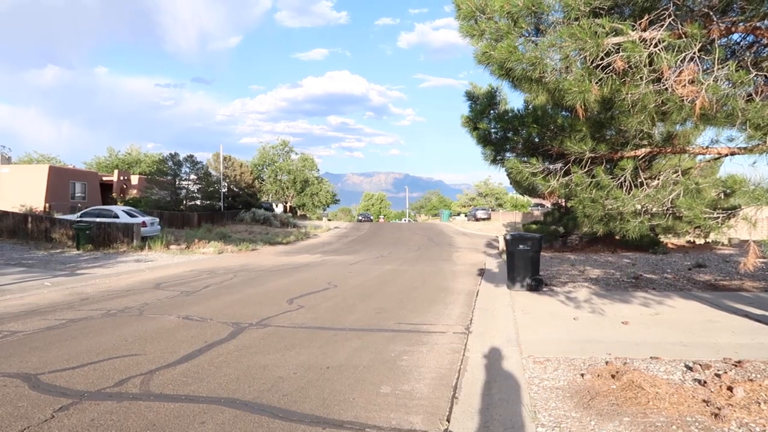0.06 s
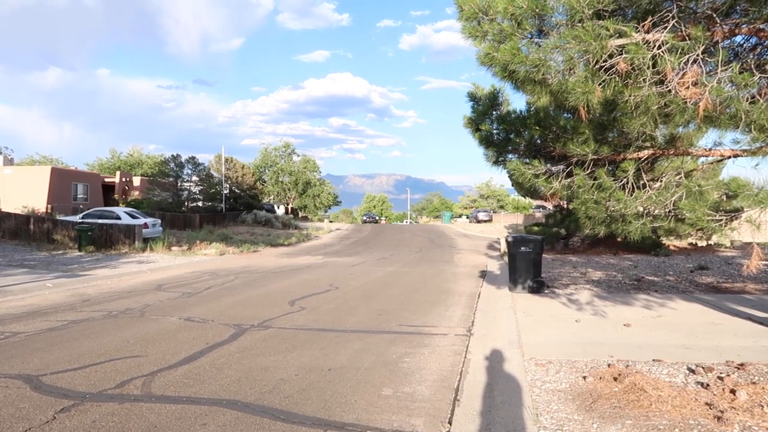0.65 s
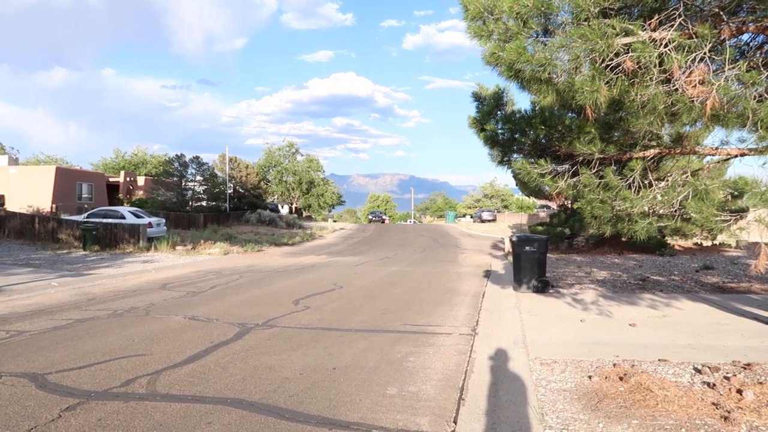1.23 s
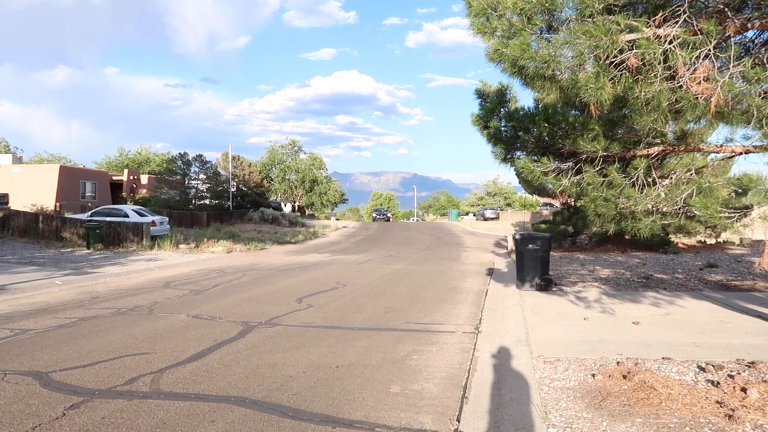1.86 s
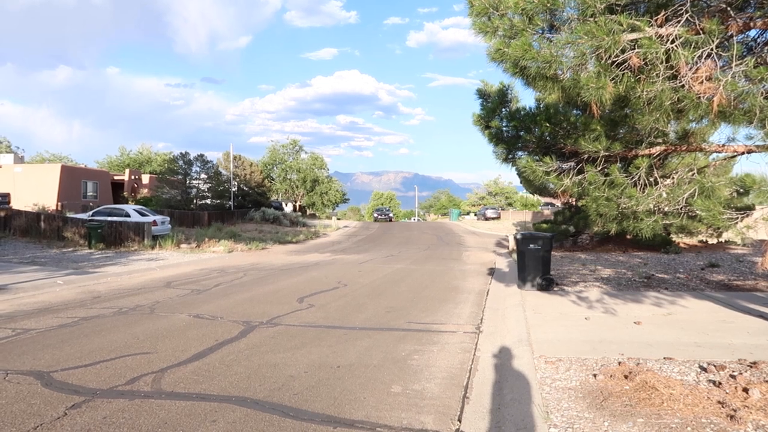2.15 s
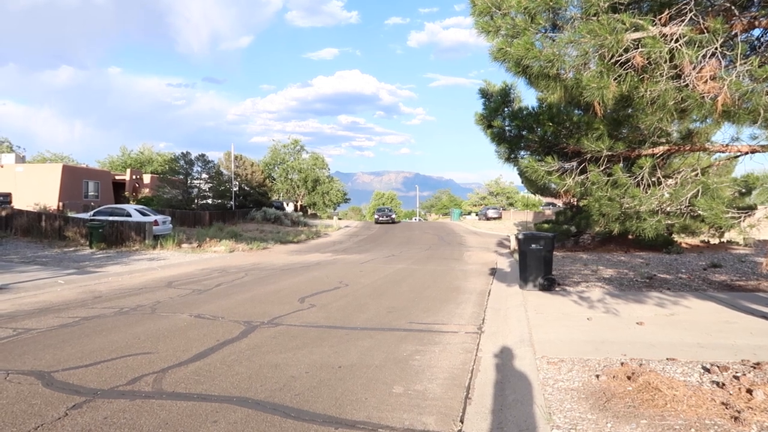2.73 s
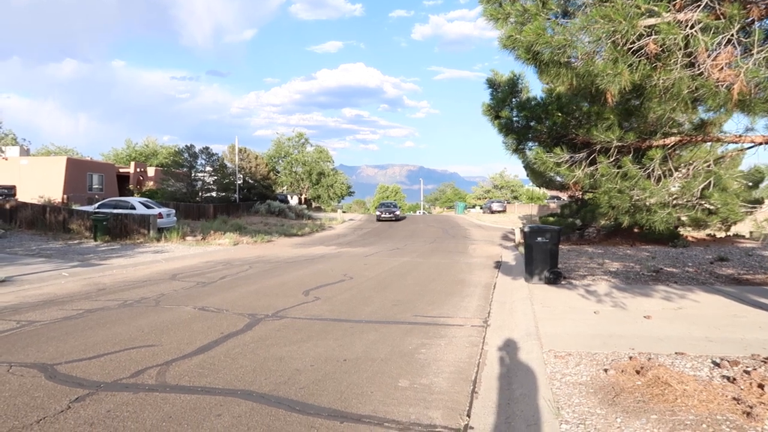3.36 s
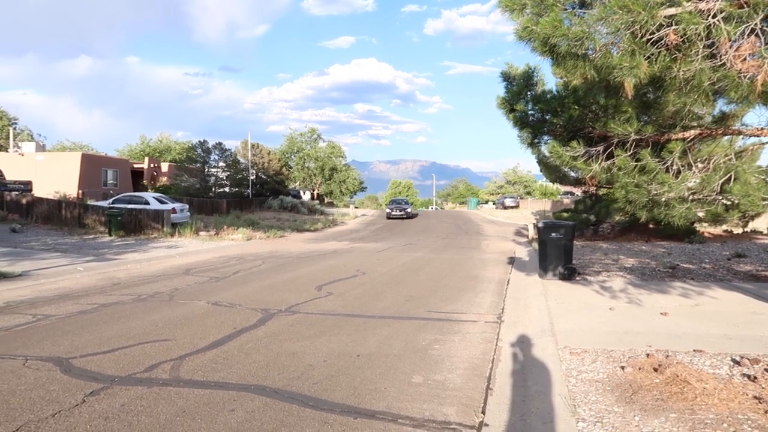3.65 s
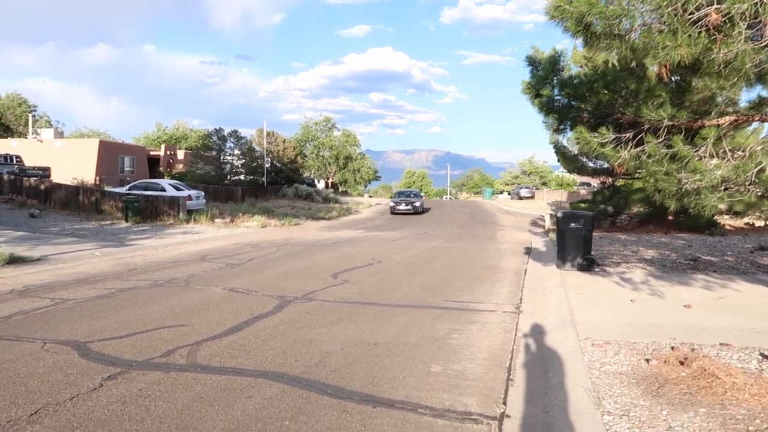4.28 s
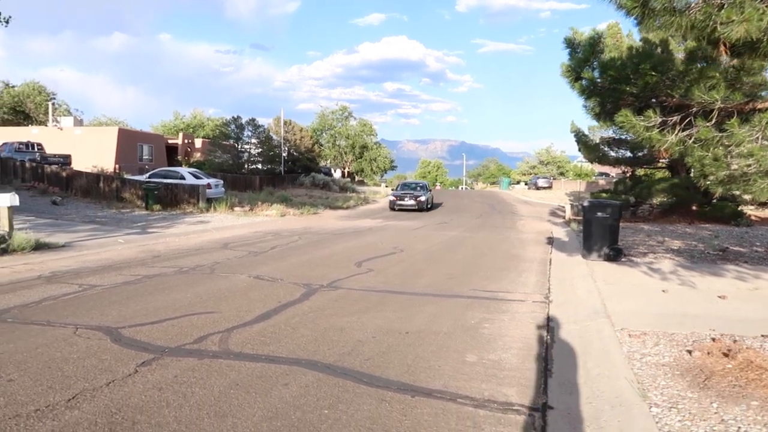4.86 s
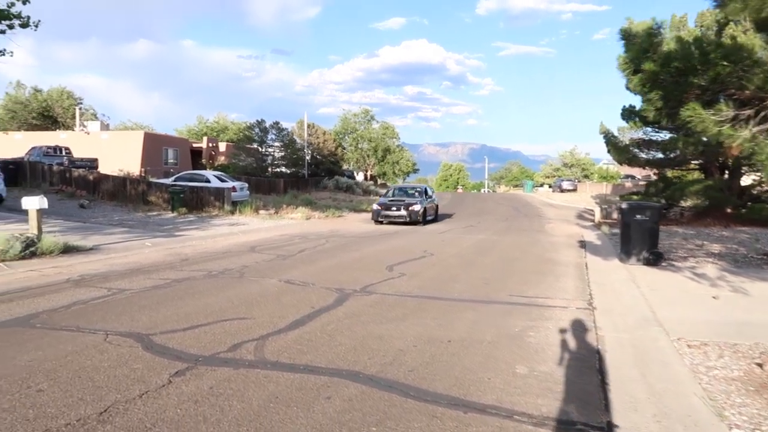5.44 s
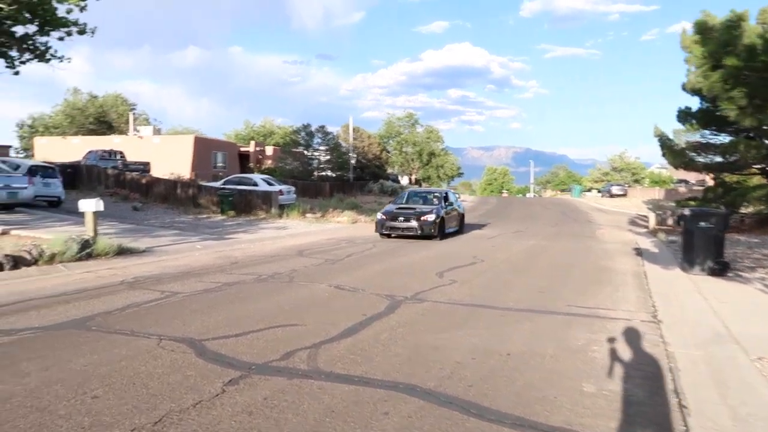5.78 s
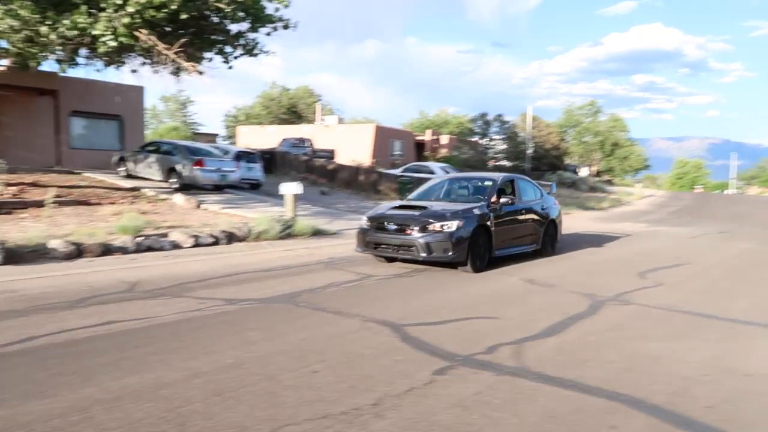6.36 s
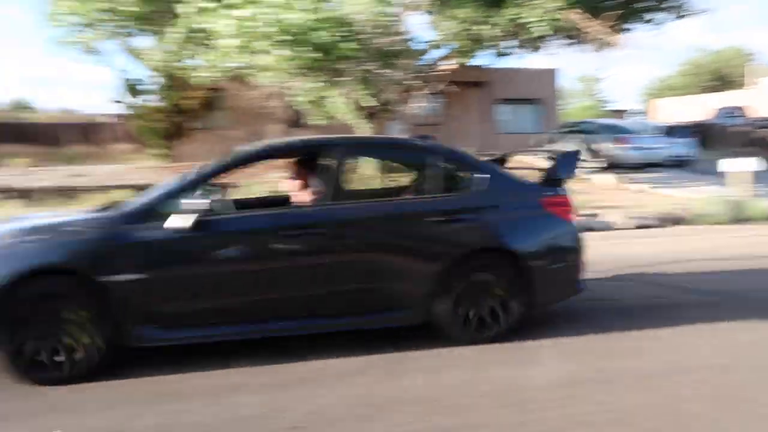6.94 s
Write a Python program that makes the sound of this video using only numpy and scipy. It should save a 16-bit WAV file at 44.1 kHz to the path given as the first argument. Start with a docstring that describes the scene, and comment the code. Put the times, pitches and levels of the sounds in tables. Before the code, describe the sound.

A car's low, uneven exhaust throb is heard in the distance over the soft hush of a quiet street. Faint bird whistles come at about 1, 3 and 4.5 seconds, and a very faint insect trills repeatedly until around 5 seconds. From about 2.7 seconds, gusts of wind buffet the microphone with a low rumble. The car accelerates closer without changing gear, its burbling note rising in pitch and growing louder from 3.5 seconds as the tyre roar builds. A few thin ticks sound near the microphone, the clearest at about 4.6 seconds. Near 5.8 seconds the turbo draws air in short, soft whooshes. From 6.3 seconds the car passes close by: the tyres hiss and snap over grit, the exhaust gives a raspy growl and the wind buffets harder. The car is still loud and close at the end, around 7 seconds.

```python
"""A turbocharged flat-four car pulls up a quiet street in one gear and passes close by.
At first its uneven exhaust pulses throb from behind a crest, while birds and an insect call in gardens.
From 2.7 s gusts buffet the microphone; the revs climb, and the exhaust and tyre roar grow.
Near 5.8 s the turbo draws air. From 6.3 s the car draws level: tyres flick grit, the tailpipe growls."""
import sys
import numpy as np
from scipy import signal
from scipy.fft import rfft, irfft
from scipy.io import wavfile
from scipy.ndimage import uniform_filter1d

SR = 44100
rng = np.random.default_rng(int(sys.argv[2]) if len(sys.argv) > 2 else 0)


def generate_wav(signal):
    """Clip the signal to [-1, 1] and save it as 16-bit WAV at the path in sys.argv[1]."""
    frames = np.transpose(np.atleast_2d(signal))
    scaled = np.clip(frames, -1, 1) * 32767
    pcm = np.round(scaled).astype(np.int16)
    wavfile.write(sys.argv[1], SR, pcm)


N = 313462
TIME, FREQS = np.arange(N) / SR, np.fft.rfftfreq(N, 1 / SR)

# left-right likeness of car noise and wind rumble: freq_hz, correlation
LIKENESS = [(150, 1), (500, 0.99), (1200, 0.98), (4000, 0.67), (9000, 1), (14000, .3)]


def exhaust(start_cycles=.254, jitter_cycles=.002, overtone_db=-13.5, rasp_db=-4):
    """Engine orders and gas noise that puffs on each of four firings a cycle, growing as the car nears."""
    # engine speed as heard: time_s, cycle_hz
    engine = [(0, 19.894), (.7, 20.432), (1.3, 20.538), (2.2, 20.515), (2.8, 20.942), (3.3, 21.572),
              (3.9, 22.598), (4.5, 23.928), (5, 25.577), (5.5, 27.516), (6, 29.962), (6.5, 32.962),
              (7.11, 37.26)]
    # gas noise: freq_hz, density_db
    rasp_spectrum = [(120, -25.5), (200, 3.5), (270, 5), (350, -6.5), (470, -1.5), (580, -6.5),
                     (700, -13.5), (1000, -18), (1500, -24.5), (4000, -55)]
    cycle_hz = curves(engine)[0]
    angle = 2 * np.pi * (start_cycles + np.cumsum(cycle_hz) / SR + jitter_cycles * wander(33))
    near = rise(5.62, .068)
    tones = overtones(angle, near)
    chug = 1 + blend(.15, .5, near) * np.cos(angle) + .3 * np.cos(4 * angle)
    rasp = noise(rasp_spectrum, LIKENESS) * unit(chug)
    bark = amp(overtone_db) * tones + amp(rasp_db) * rasp + resonances(angle, cycle_hz)
    bark_db = crest_db(-29, hidden_db=12.5, at_s=3.21, over_s=1.33) + 2 * rise(6.06, .15)
    return boom(angle, near) + amp(bark_db) * bark + growl(angle)


def boom(angle, near, fading_db=1.2):
    """The firing note and the strong orders that beat against it, locked to the crank: a regular throb."""
    # strong orders: time_s, firing_db, lower_burble_db, upper_burble_db
    levels = [(0, -28, -32, -25.5), (.45, -35, -25, -24), (.95, -28.5, -30, -29.5), (1.65, -28, -32.5, -34),
              (2.5, -23, -25.5, -24), (3.2, -23.5, -21.5, -22), (3.58, -16, -15.5, -21),
              (4.05, -12.5, -20, -19.5), (4.6, -17.5, -17.5, -19.5), (5.05, -13.5, -19.5, -19.5),
              (5.5, -13.5, -18, -29), (5.85, -12.5, -19.5, -33), (6.15, -19.5, -17.5, -28.5),
              (6.6, -21.5, -21, -26.5), (6.9, -16, -25.5, -34)]
    # burble weights: order, far_db, near_db
    burble = [(3, -21.5, -6.5), (5, 0.5, -0.5), (7, 0, -13), (8, -5.5, 1.5), (9, -17, -5.5)]
    firing_db, lower_db, upper_db = curves(levels)
    out = amp(firing_db - dip_db(4)) * np.cos(4 * angle)
    # the path spreads the orders in time until the direct sound takes over
    spread_rad = 2 * np.pi * blend(.042, -.01, rise(4.7, .8))
    for k, far_db, near_db in burble:
        echo_rad = blend(.2, .12, near) * wander(3)
        lag_rad = spread_rad * (k - 4.3) ** 2 + np.pi / 2 * (k < 4) + echo_rad
        level_db = (lower_db if k < 6 else upper_db) + fading_db * wander(4)
        out += amp(level_db + blend(far_db, near_db, near) - dip_db(k)) * np.cos(k * angle - lag_rad)
    uneven_db = blend(.5, .8, near) * wander(17)
    return np.sqrt(2) * out * amp(uneven_db)


def dip_db(k):
    """Brief drops in the level of order k."""
    # dips: centre_s, order, half_length_s, depth_db
    dips = [(1.098, 4, .07, 9), (1.793, 5, 0.12, 10), (3.263, 5, 0.066, 12), (3.766, 4, 0.11, 8),
            (4.297, 5, 0.062, 8), (4.357, 4, 0.15, 10), (4.716, 5, 0.063, 8), (5.103, 8, 0.26, 18.5),
            (5.25, 4, 0.042, 16.5), (5.66, 5, 0.046, 3.5), (5.727, 4, 0.039, 20), (6.976, 4, 0.033, 17),
            (7.048, 5, 0.15, 7)]
    return sum(depth_db * bump(s, half_s) for s, order, half_s, depth_db in dips if order == k)


def overtones(angle, near, smear_cycles=.01716, scatter=.35):
    """Weaker orders arrive both directly and scattered off the street, so they flutter."""
    # weighting by the unequal headers: order, far_db, near_db
    orders = [(6, 0, 0), (10, -1, -3), (11, 4, -4), (12, 4.5, -1), (13, 0, 0), (14, -7, -7), (15, -2, -5),
              (16, 0, -5), (17, -6, -11), (18, -9, -4), (19, -3, -5), (20, -5, -6), (21, -3, -5),
              (22, -7, -7), (23, -2, -13), (24, -3, -14), (25, -8, -15), (26, -8, -10), (28, -7, -12),
              (29, -11, -13), (33, -7, -16)]
    out = 0
    for k, far_db, near_db in orders:
        phase = k * angle - np.pi * smear_cycles * (k - 3) ** 2  # treble leaves the pipe last
        flutter = 1 + scatter * wander(4)
        echo_rad = blend(1.3, .5, near) * wander(2)
        out += blend(amp(far_db), amp(near_db), near) * flutter * np.cos(phase + echo_rad)
    return np.sqrt(2) * out


def resonances(angle, cycle_hz):
    """Single orders sing out as the revs sweep them through resonances of the car."""
    # resonances: order, centre_hz, half_width_ratio, level_db
    modes = [(33, 686, .02, -13), (28, 630, .016, -13), (33, 744, .014, -15), (12, 292, .07, -13),
             (21, 567, .035, -7), (33, 895, .03, -17), (22, 672, .03, -9), (13, 390, .035, -8),
             (17, 562, .04, 2), (23, 488, .03, -6), (16, 326, .02, -11), (26, 850, .04, -19),
             (28, 938, .025, -17), (21, 700, .016, -12), (34, 1195, .025, -13), (17, 622, .025, -7),
             (13, 474, .025, -5.5)]
    out = 0
    for k, hz, width, db in modes:
        in_tune = np.exp(-((k * cycle_hz / hz - 1) / width) ** 2)
        out += amp(db + wander(28)) * in_tune * np.cos(k * angle)
    return np.sqrt(2) * out


def growl(angle, ragged=.55):
    """Each firing throws a ragged puff that rings the tailpipe, strongest once a cycle."""
    # pipe response: freq_hz, gain_db
    tailpipe = [(250, -56), (430, 1), (540, 1), (640, 10.5), (760, -4), (900, -17), (1500, -31),
                (4000, -47)]
    # growls: centre_s, half_length_s, level_db
    growls = [(6.62, .07, -31), (7.055, .07, -24)]
    puffs = ((1 + np.cos(4 * angle)) / 2) ** 8 * (1 + .5 * np.cos(angle))
    gas = unit(uniform_filter1d(rng.standard_normal(N), size=20))
    ring = irfft(rfft(puffs * (1 + ragged * gas)) * amp(at_hz(tailpipe, FREQS)), N)
    return unit(ring) * swells(growls)


def rolling():
    """Tread roar on coarse asphalt, air rushing round the car and, up close, a fine spray of grit."""
    # roar, rush and spray: freq_hz, density_db
    roar_spectrum = [(300, -30), (600, 1.5), (800, -2), (960, 0), (1150, -5.5), (1290, -9.5), (1500, -12),
                     (2000, -19.5), (3500, -32.5), (8000, -61)]
    rush_spectrum = [(800, -17.5), (1500, 1), (2200, 2), (3100, -0.5), (4000, -6), (5000, -12),
                     (6000, -16.5), (8000, -23), (12000, -53.5)]
    spray_spectrum = [(2500, -15.5), (5000, -1), (7000, -2.5), (9000, -8), (13000, -7.5), (15000, -26.5)]
    # coarse asphalt: centre_s, half_length_s, boost_db
    patches = [(4.648, 0.13, 2), (5.423, 0.035, 4.5), (5.726, 0.11, 2.5), (6.569, 0.078, 6),
               (6.89, 0.043, 1.5)]
    coarse_db = sum(db * bump(s, half_s) for s, half_s, db in patches)
    roar_db = crest_db(-35.5, hidden_db=15.5, at_s=2, over_s=1.5) + coarse_db
    rush_db = crest_db(-46, hidden_db=11, at_s=2.5, over_s=3) + .58 * coarse_db
    spray_db = crest_db(-55, hidden_db=43, at_s=5.5, over_s=.95) + .6 * coarse_db
    roar = noise(roar_spectrum, LIKENESS) * amp(roar_db + .9 * wander(49))
    rush = noise(rush_spectrum, LIKENESS) * amp(rush_db + wander(41))
    spray = noise(spray_spectrum, LIKENESS) * amp(spray_db + wander(80))
    return roar + rush + spray


def grooves():
    """Air pumped through the tread rings in narrow bands that change with the stretch of road."""
    # groove tones: centre_s, half_length_s, pitch_hz, half_width_hz, level_db
    bands = [(1.504, 0.79, 878, 40, -54.5), (3.006, 0.47, 1033, 21.8, -46.5), (4.716, 0.21, 858, 22, -40),
             (5.752, 0.13, 1110, 40, -42), (6.455, 0.73, 1093, 50.3, -41.5)]
    out = 0
    for s, half_s, hz, width_hz, db in bands:
        phase = 2 * np.pi * hz * TIME
        band = wander(width_hz) * np.cos(phase) + wander(width_hz) * np.sin(phase)
        out += amp(db) * bump(s, half_s) * band
    return out


def turbo():
    """Short whooshes of intake air as the boost comes on."""
    # intake swells: centre_s, half_length_s, level_db
    whooshes = [(5.626, 0.058, -49), (5.775, 0.098, -42), (6.013, 0.099, -45.5)]
    # intake noise: freq_hz, density_db
    spectrum = [(1200, -14), (2300, -3), (3100, -1.5), (4200, -8), (6000, -16.5), (8000, -24.5),
                (14000, -38)]
    return swells(whooshes) * noise(spectrum, LIKENESS)


def knocks(ring_db=-24, detune=.045):
    """Grit and tar seams snap under a tyre and ring it, never quite at the same pitch."""
    # impacts: start_s, peak_db, low_hz, high_hz
    grit = [(1.644, -28.5, 850, 1100), (6.368, -19, 350, 800), (6.482, -26, 1200, 3800),
            (6.497, -25, 900, 1300), (6.515, -27, 900, 3000), (6.591, -25, 800, 2400),
            (6.671, -18, 500, 1200), (6.693, -22, 600, 2300), (6.7226, -9, 150, 2100),
            (6.7258, -19, 400, 2200), (6.886, -19, 350, 900), (6.892, -18, 450, 1900),
            (6.899, -21, 450, 1400)]
    # tyre modes: pitch_hz, level_db, t60_s
    modes = [(620, 0, .025), (970, 3, 0.032), (1510, -17, .022), (2140, -30, .04), (2620, -5, .02),
             (3000, -12, 0.046)]
    out, t = snaps(grit, decay_s=.0016, crumble=.064, order=5), np.arange(4096) / SR
    for s, db, _, _ in grit:
        shift = 1 + detune * rng.uniform(-1, 1)
        ring = sum(amp(mode_db - 60 * t / t60_s) * np.sin(2 * np.pi * hz * shift * t)
                   for hz, mode_db, t60_s in modes)
        add(out, s, amp(db + ring_db) * ring)
    return out


def wind(eddy_db=1, push_db=-12, swell_db=3, lumps_db=1.2):
    """Breeze and gusts on the microphone: eddies over a slow pressure that both ports share."""
    # breeze: time_s, eddies_db, pressure_db
    breeze = [(0, -83, -57), (1.2, -92, -48), (2.3, -67.5, -33.5), (2.75, -42, -23), (3.7, -54.5, -40),
              (5.35, -39, -24), (5.7, -44.5, -44.5), (6.3, -34, -34), (7.11, -41, -36)]
    # gusts: centre_s, half_length_s, level_db
    gust_times = [(2.711, .02, -29), (2.795, 0.021, -19.5), (2.923, 0.035, -26), (3.357, 0.032, -39),
                  (4.15, 0.039, -38), (4.873, 0.052, -36.5), (5.443, 0.011, -21), (5.77, 0.052, -25.5),
                  (5.906, 0.015, -30), (6.053, 0.049, -26.5), (6.246, 0.039, -19), (6.358, 0.04, -23.5),
                  (6.64, 0.097, -19.5), (6.947, 0.16, -18)]
    # slow pressure: freq_hz, density_db
    pressure_spectrum = [(8, -13), (25, -7.5), (50, -7), (80, 3.5), (140, -7), (400, -48.5), (2000, -91)]
    buffet = eddies()
    breeze_db, pressure_db = curves(breeze) + swell_db * wander(29)
    gusts = swells(gust_times)
    rumble = noise(pressure_spectrum, LIKENESS) * (amp(pressure_db) + amp(push_db) * gusts)
    lumps = unit(amp(lumps_db * wander(35)))
    return rumble + amp(eddy_db) * buffet * lumps * (amp(breeze_db) + gusts)


def eddies(calm_hz=210, wake_hz=480, swing_s=6.18):
    """Eddies strike the two ports out of step, finer as the microphone swings into the car's wake."""
    # buffeting before the low-pass: freq_hz, density_db
    spectrum = [(15, -40), (45, -18), (85, -4), (170, 0), (400, -1), (2000, -5)]
    turbulence = noise(spectrum, likeness=[(20, .49), (200, -.033), (2000, -.43)])
    hz, t, frames = signal.stft(turbulence, SR, nperseg=1024)
    corner_hz = blend(calm_hz, wake_hz, (1 + np.tanh((t - swing_s) / 1.4)) / 2)
    lowpass = 1 / np.sqrt(1 + (hz[:, None] / corner_hz) ** 7)
    lowpass /= np.linalg.norm(lowpass * amp(at_hz(spectrum, hz))[:, None], axis=0)  # constant power
    return unit(signal.istft(frames * lowpass, SR, nperseg=1024)[1][:, :N])


def ticks(ring_db=-16, ring_t60_s=.03):
    """Thin snaps near the microphone, each with a brief ring."""
    # ticks: start_s, level_db, low_hz, high_hz, ring_hz
    hits = [(2.618, -30.5, 6660, 11000, 8100), (4.106, -30, 5200, 7600, 6300),
            (4.582, -20, 4480, 7400, 5560), (5.029, -35, 5040, 14000, 9000)]
    out = snaps([row[:4] for row in hits], decay_s=.0007, crumble=.91, order=2)
    t = np.arange(4096) / SR
    for s, db, _, _, hz in hits:
        ring = np.sin(2 * np.pi * (hz * t + rng.random()))
        add(out, s, amp(db + ring_db - 60 * t / ring_t60_s) * ring)
    return out


def birds(flutter_db=2):
    """Whistles, mostly rising, that level off; some pure, some buzzy."""
    # notes: start_s, length_s, start_hz, end_hz, level_db, buzz_ratio
    notes = [(.98, .23, 4990, 5050, -64, .002), (1.02, .085, 4980, 5040, -54.5, .002),
             (1.225, .09, 2650, 2850, -55, .002), (1.31, .13, 2890, 2980, -53, .002),
             (2.99, .16, 3490, 3510, -51.5, .022), (3.195, .08, 3490, 3485, -43.5, .006),
             (3.275, .085, 3450, 3545, -52, .006), (4.32, .24, 4300, 6350, -60.5, .012),
             (4.36, .14, 6200, 6700, -69, .007), (4.36, .16, 7150, 7200, -69, .005),
             (4.53, .23, 3450, 4120, -51.5, .005), (4.56, .15, 3280, 3500, -54, .007)]
    out = np.zeros(N)
    for s, length_s, start_hz, end_hz, db, buzz in notes:
        n = int(length_s * SR)
        progress = np.linspace(0, 1, n)
        glide_hz = end_hz + (start_hz - end_hz) * (1 - progress) ** 2
        hz = glide_hz * (1 + buzz * wander(110)[:n])
        swell = np.sin(np.pi * progress ** .83) * amp(db + flutter_db * wander(28)[:n])
        add(out, s, np.sqrt(2) * swell * np.sin(2 * np.pi * np.cumsum(hz) / SR))
    return out


def insect(level_db=-66, pitch_hz=4960, half_s=.053, trill_hz=30):
    """Short trills on one fuzzy pitch."""
    # chirps: centre_s
    chirps = [.3, .66, 1.38, 1.76, 2.08, 2.43, 2.83, 3.17, 3.78, 4.1, 4.482, 4.829, 5.35]
    tone = np.sin(2 * np.pi * np.cumsum(pitch_hz * (1 + .0087 * wander(75))) / SR)
    trills = sum(bump(s, half_s) * (1 + np.cos(2 * np.pi * trill_hz * (TIME - s))) for s in chirps)
    return amp(level_db) * tone * trills


def street(level_db=-61):
    """The steady hush of the street."""
    # hush: freq_hz, density_db
    spectrum = [(30, 5.5), (150, 1.5), (600, 3.5), (1500, -3), (3000, 4.5), (5000, 6.5), (8000, 1.5),
                (11000, -5), (14500, -45.5)]
    # left-right likeness: freq_hz, correlation
    likeness = [(200, 0.89), (1200, .6), (3000, -0.76), (7000, -0.74), (14000, -0.67)]
    return amp(level_db) * noise(spectrum, likeness)


def snaps(rows, decay_s, crumble, order):
    """Sharp impacts with a short crumbling tail, each in its own band."""
    out, t = np.zeros(N), np.arange(4096) / SR
    for s, db, low_hz, high_hz in rows:
        band = signal.butter(order, [low_hz, high_hz], "band", fs=SR, output="sos")
        tail = crumble * rng.standard_normal(len(t)) * np.exp(-t / decay_s)
        snap = signal.sosfilt(band, (t == 0) + tail)
        add(out, s, amp(db) * snap / abs(snap).max())
    return out


def noise(spectrum, likeness):
    """Coloured noise of rms 1 on two partly alike channels."""
    a, b = rfft(rng.standard_normal((2, N)))
    correlation = at_hz(likeness, FREQS)
    mid, side = a * np.sqrt(1 + correlation), b * np.sqrt(1 - correlation)
    return unit(irfft(np.array([mid + side, mid - side]) * amp(at_hz(spectrum, FREQS)), N))


def wander(rate_hz):
    """Random drift of rms 1, up to about rate_hz."""
    hz = np.fft.rfftfreq(2048, 1 / 256)
    slow = irfft(rfft(rng.standard_normal(2048)) / (1 + (hz / rate_hz) ** 4))
    return np.interp(TIME * 256, np.arange(2048), unit(slow))


def crest_db(close_db, hidden_db, at_s, over_s):
    """Level of a sound coming out from behind the crest."""
    return close_db - hidden_db * (1 - rise(at_s, over_s))


def rise(at_s, over_s):
    """Smooth step from 0 to 1, halfway at at_s."""
    return (1 + np.tanh((TIME - at_s) / over_s)) / 2


def bump(s, half_s):
    """Bell curve of height 1."""
    return np.exp(-((TIME - s) / half_s) ** 2)


def swells(rows):
    """Gain from a sum of bell curves."""
    return sum(amp(db) * bump(s, half_s) for s, half_s, db in rows)


def blend(a, b, share):
    """Crossfade from a to b."""
    return a * (1 - share) + b * share


def curves(rows):
    """Each column of a timed table at every sample."""
    s, *columns = np.transpose(rows)
    return [np.interp(TIME, s, column) for column in columns]


def at_hz(points, hz):
    """A table interpolated over log frequency."""
    points_hz, values = np.transpose(points)
    return np.interp(np.log(hz + 1), np.log(points_hz), values)


def amp(db):
    """Decibels to gain."""
    return 10 ** (np.asarray(db) / 20)


def unit(x):
    """Scales to rms 1."""
    return x / np.sqrt(np.mean(x ** 2) + 1e-20)


def add(mix, start_s, sound):
    """Mixes a sound in at start_s."""
    part = mix[round(start_s * SR):][:len(sound)]
    part += sound[:len(part)]


def scene(ticks_db=1):
    """The car ahead, gardens to the left, ticks and wind at the microphone, the street all round."""
    car = exhaust() + rolling() + grooves() + turbo() + knocks()
    # close ticks reach each port differently, partly in opposite phase
    ports = amp(ticks_db) * np.array([ticks(), ticks()])
    close_ticks = ports - .31 * ports[::-1]
    gardens = np.array([[1.3], [.7]]) * (birds() + insect())
    return car + wind() + close_ticks + gardens + street()


def record(dry):
    """The microphone's band limit."""
    lowpass = signal.firwin(255, 14800, window=("kaiser", 8), fs=SR)
    return signal.oaconvolve(dry, lowpass[None], "same")


dry = scene()
out = record(dry)
generate_wav(out)
```